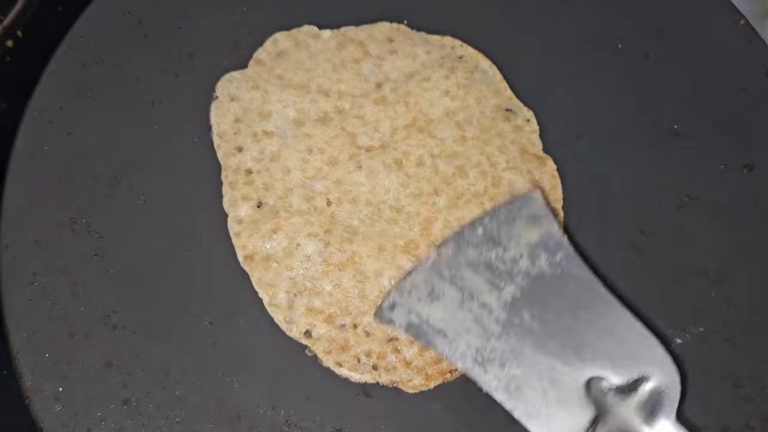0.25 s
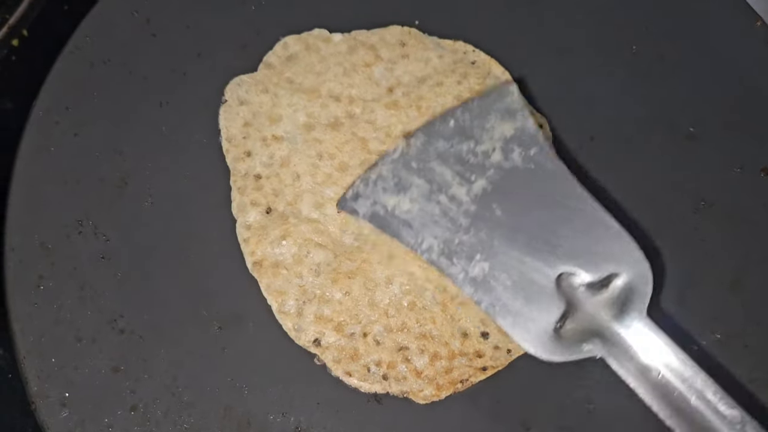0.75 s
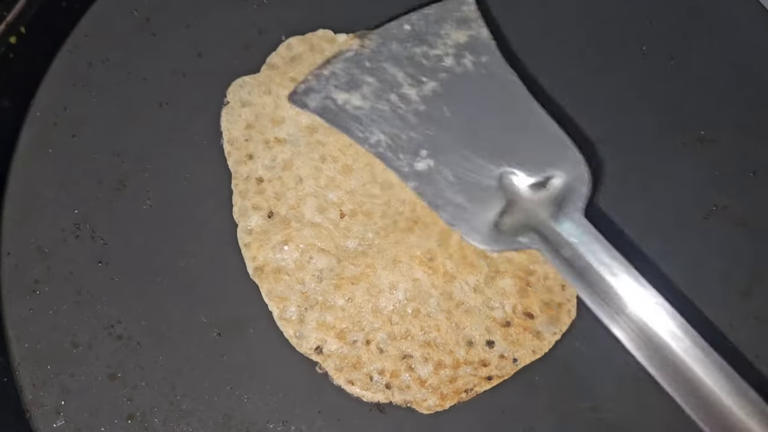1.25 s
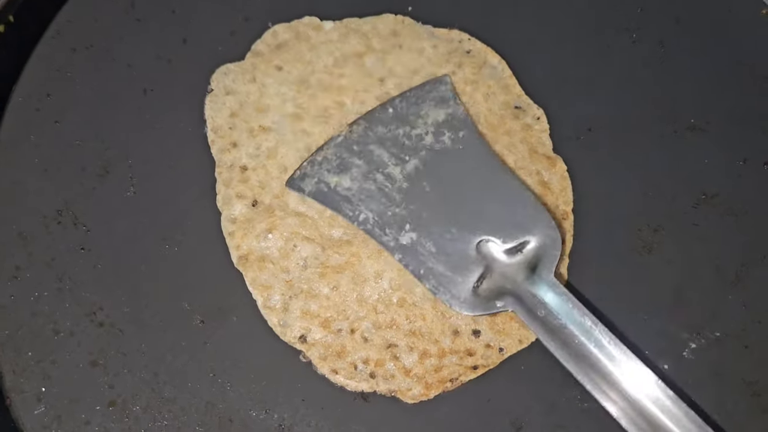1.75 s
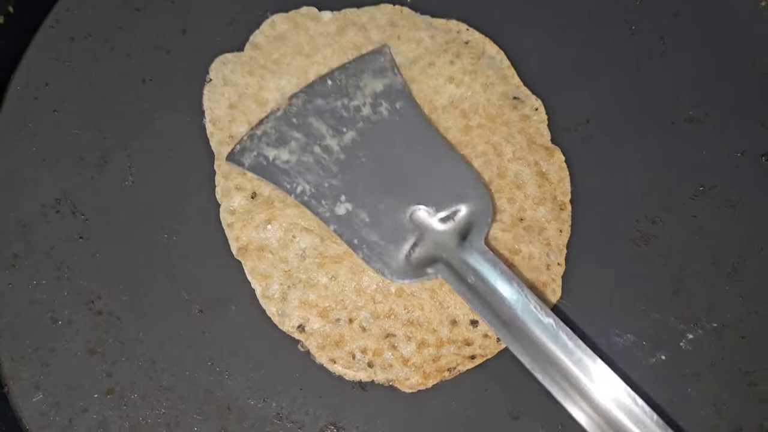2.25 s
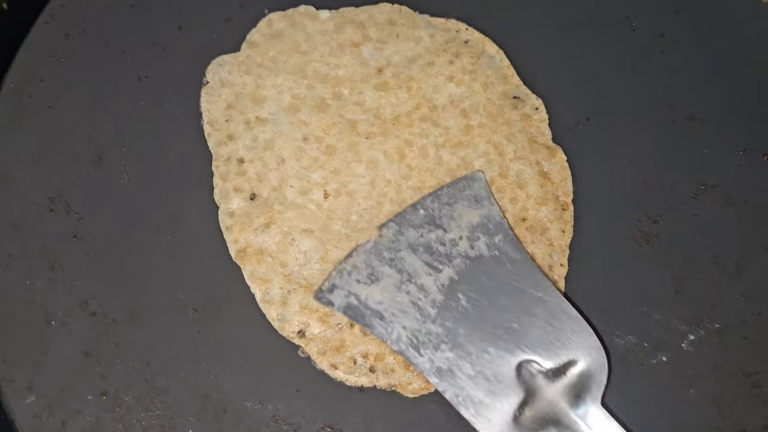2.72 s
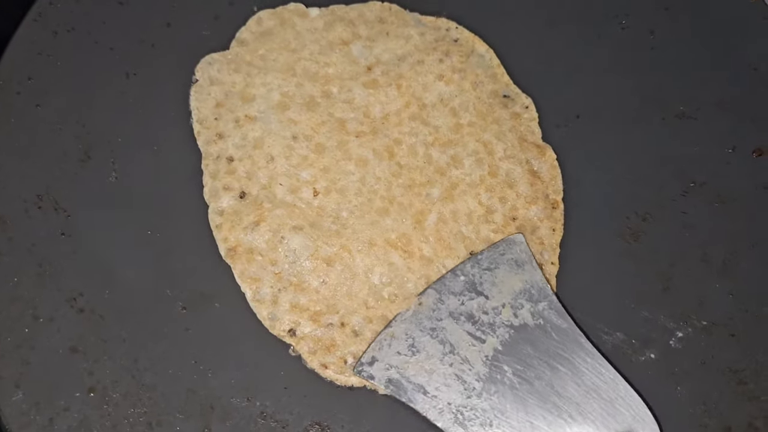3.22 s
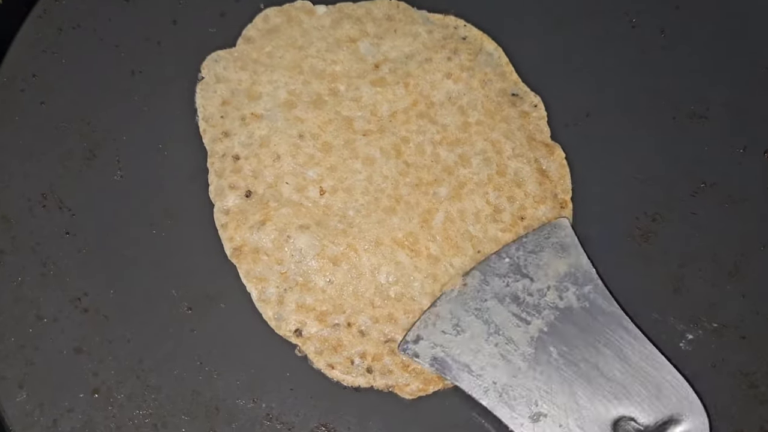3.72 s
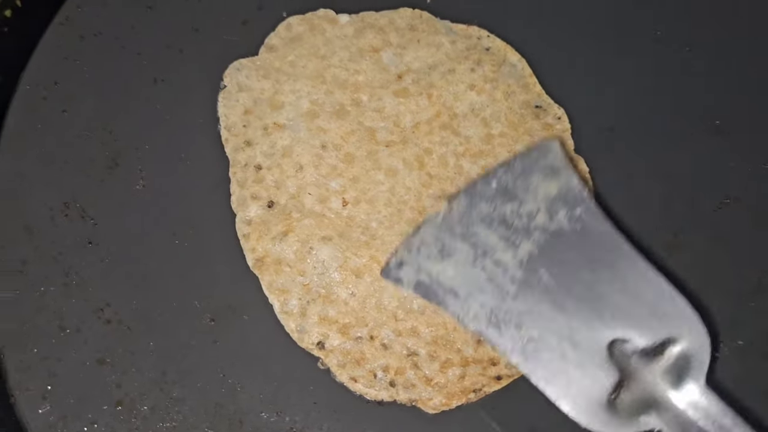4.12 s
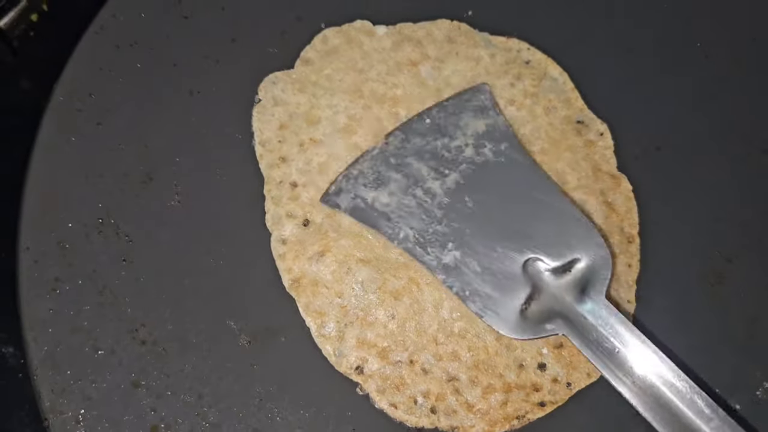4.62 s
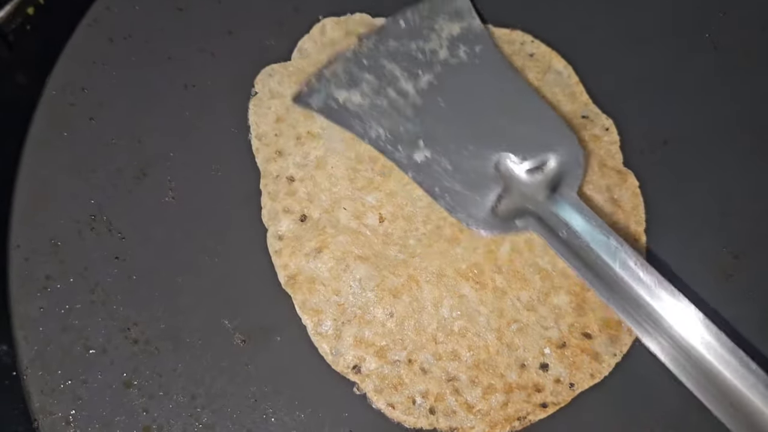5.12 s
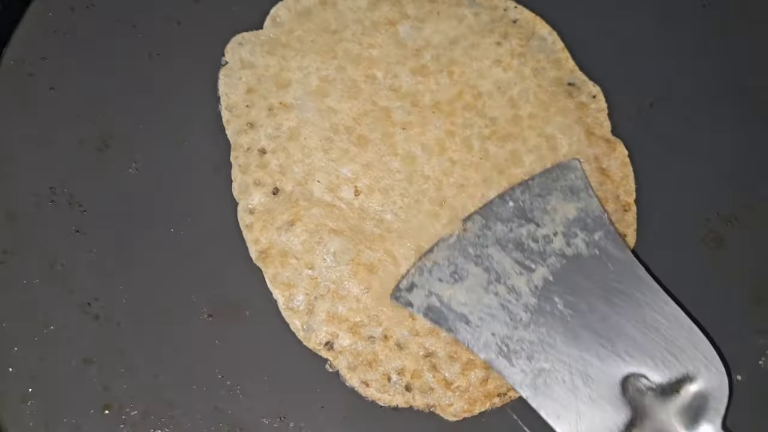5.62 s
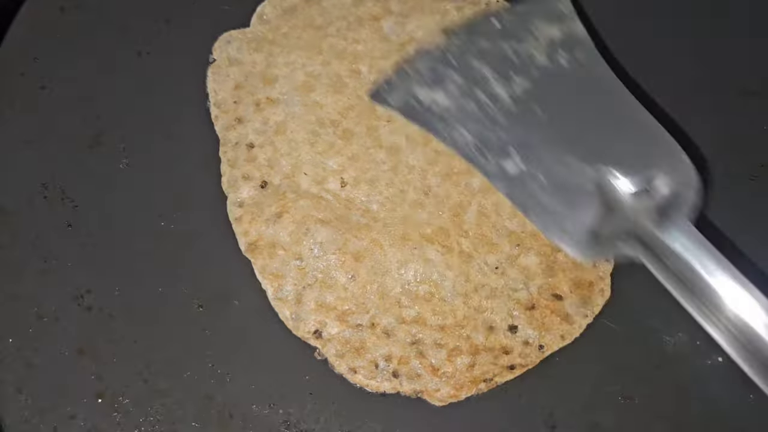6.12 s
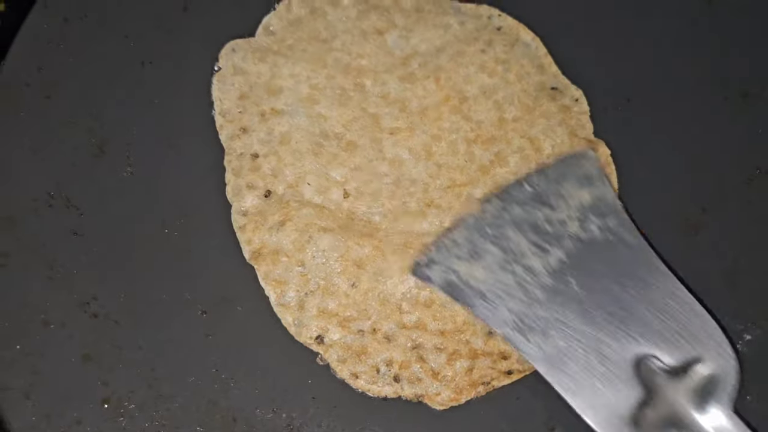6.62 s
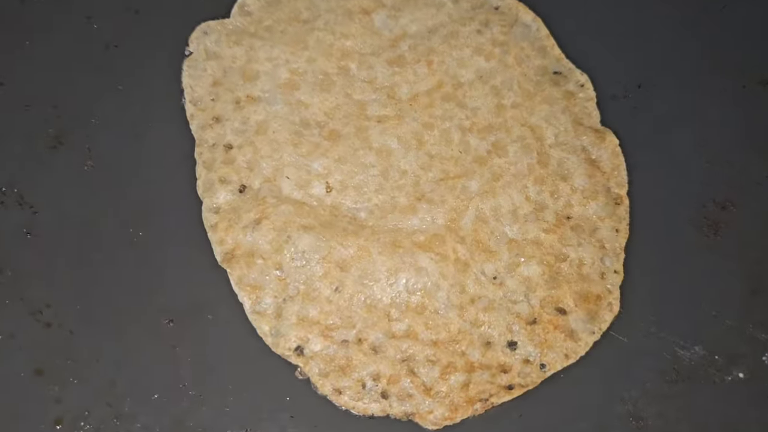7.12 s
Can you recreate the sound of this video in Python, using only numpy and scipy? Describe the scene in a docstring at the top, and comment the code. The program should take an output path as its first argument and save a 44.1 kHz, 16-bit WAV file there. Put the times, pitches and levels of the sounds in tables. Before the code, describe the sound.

Close stereo sound of a thin flatbread frying on a steel griddle: a fine high hiss, dense crackling and tiny sharp pops, over a faint kitchen rumble. Right away a spatula taps and presses, with a crunchy swell at 0.1 s and scrapes near 0.5 and 0.9 s. At about 1.4 s the sizzle surges, and again near 2.1 s. From 2.6 to 3.7 s presses follow closely, with rough dragging, crisp crust crunch and clustered pops; a firm clack lands at 3.4 s and another at 4.0 s. Softer taps come at 4.3 and 4.6 s, then the brightest, short metallic clink at 4.9 s with a burst of steam. Scrape and crunch return around 5.5 to 5.9 s, a second clear clink at 6.3 s, and a last scrape by 6.5 s. After that the frying thins to quiet hiss and scattered ticks, with two barely audible touches around 7.2 s, until 7.4 s.

```python
"""A thin flatbread fries on a steel griddle, heard close up: steam and fat spit in dense tiny noise bursts.
Sharp single pops, each a short sine blip with a bright spit and a push, stand out of the sizzle.
A steel spatula taps the bread: decaying sines ring its blade and the plate, noise bursts crack and knock.
Then it presses and drags, swelling the scrape, the crunch of the crust and the sizzle.
A dull thrum, a low kitchen rumble and a faint room tail lie underneath."""
import sys
import numpy as np
from scipy import signal
from scipy.fft import rfft, irfft, next_fast_len
from scipy.io import wavfile
from scipy.ndimage import map_coordinates

SR = 44100
rng = np.random.default_rng(int(sys.argv[2]) if len(sys.argv) > 2 else 0)


def log_audio(samples):
    """Write samples as a 16-bit WAV file to the path given in sys.argv[1]."""
    # one column per channel
    frames = np.atleast_2d(samples).T
    # limit to full scale, then quantise
    limited = np.clip(frames, -1, 1)
    pcm = np.round(limited * 32767).astype(np.int16)
    wavfile.write(sys.argv[1], SR, pcm)


N = 324537

# the bread frying untouched:
# (time [s], rustle of the crust [dB], sizzle of the fat [dB], kitchen rumble [dB])
QUIET_FRYING = [(0, -50.5, -54, -63.5), (.8, -49, -55.5, -60.5), (1.3, -50, -54.5, -66),
                (1.9, -48, -48, -63), (2.6, -50.5, -47, -67), (3.3, -54, -47.5, -62.5),
                (3.9, -55, -52, -61.5), (4.5, -57, -53, -61.5), (4.85, -55, -57, -61.5),
                (5.05, -59, -59, -54), (5.3, -52, -52.5, -59), (5.6, -58.5, -56.5, -66.5),
                (6.1, -55, -52.5, -65), (6.5, -51.5, -45.5, -65), (6.95, -57, -55, -65),
                (7.36, -56, -49.5, -65)]
# crunch and thrum over the rustle, steam over the sizzle
QUIET_CRUNCH_DB, QUIET_STEAM_DB, QUIET_THRUM_DB = -2.95, 0, -12.5
# the spatula presses or drags the bread; the sign of rise and fall is ignored:
# (time [s], rise [s per 10 dB], hold [s], fall before lingering [s per 10 dB],
#  drag [dB], crunch [dB], sizzle [dB], steam [dB], thrum [dB])
PRESS_STROKES = [(0.002, 0.5, 0.00988, -0.16, -49, -52.5, -53.5, -48, -64.5),
                 (.088, -6.72, 0.0496, 0.1636, -44, -33.5, -39.5, -39, -50),
                 (0.298, 0.26, 0.0196, 0.53, -44, -58, -46, -43, -61.5),
                 (0.505, -0.0041, 0.0394, 0.077, -37, -36, -45, -40.5, -46.5),
                 (0.682, 0.12, 0.0095, 0.1841, -48.5, -45, -44.5, -42, -58),
                 (0.927, -0.05, 0.0134, -0.0161, -39, -40, -39.5, -39, -59),
                 (1.092, 0.47, 0.203, 0.83, -50.5, -50.5, -44.5, -43, -66.5),
                 (1.384, 0.0367, 0.00871, 0.0966, -40, -42.5, -35, -33, -54),
                 (1.684, -0.3056, 0.0096, 0.154, -47, -46.5, -44, -42, -50.5),
                 (2.083, 0.06, 0.0205, 0.2257, -45, -47.5, -36.5, -35, -58.5),
                 (2.261, 0.01, 0.0098, 0.25, -43.5, -46.5, -42, -44, -57.5),
                 (2.429, -0.03, 0.0088, 0.1531, -43, -44, -39.5, -35.5, -52),
                 (2.611, 0.0084, 0.0366, .09, -35.5, -38.5, -39, -37, -42),
                 (2.79, 0.0312, 0.0274, 0.0838, -38, -31.5, -45, -41, -44),
                 (2.952, 0.0623, 0.0573, 0.0617, -40.5, -31, -38, -43.5, -48.5),
                 (3.141, 0.0945, 0.0733, 0.0621, -48.5, -34, -38, -42.5, -61),
                 (3.311, 0.59, 0.0194, -0.2131, -53, -47.5, -49.5, -43, -64),
                 (3.417, 0.1141, 0.05081, 0.0628, -54.5, -36.5, -39, -43.5, -55),
                 (3.663, 0.0526, 0.018, 0.1761, -49.5, -36.5, -38.5, -40.5, -51),
                 (3.986, 0.0067, .005, 0.0663, -39.5, -31.5, -35.5, -37.5, -44.5),
                 (4.176, 0.61, 0.01422, -0.45, -50, -49.5, -48, -48.5, -62),
                 (4.301, 0.0652, 0.0067, 0.1332, -45.5, -43, -49, -42, -47),
                 (4.416, 0.17, 0.02233, 0.24, -49.5, -52, -50.5, -48, -62),
                 (4.588, -0.0039, 0.0217, 0.1255, -41.5, -43, -47, -43.5, -47.5),
                 (4.787, 0.09, .01, 0.1754, -52, -45.5, -45.5, -48, -63),
                 (4.927, 0.0314, 0.0214, 0.1077, -43.5, -42.5, -35.5, -35, -52.5),
                 (5.148, 0.07, 0.0145, 0.1826, -44.5, -49, -42, -41, -54),
                 (5.489, 0.15, 0.0108, 0.0786, -38.5, -43.5, -48.5, -44.5, -48),
                 (5.678, 0.131, 0.0574, 0.1359, -40.5, -35, -51, -44, -50),
                 (5.873, 0.24, 0.00508, 0.0673, -65.5, -41.5, -42.5, -45, -64),
                 (5.998, 0.0905, .01, 0.21, -53, -51, -51.5, -54.5, -60.5),
                 (6.315, 0.0753, 0.045, 0.2422, -49.5, -49.5, -49.5, -45.5, -53),
                 (6.445, 0.0868, 0.0108, 0.0688, -40.5, -45.5, -40, -41, -53),
                 (6.521, 0.0012, 0.0153, 0.14, -43, -41, -48.5, -46, -54.5),
                 (7.081, 0.06, 0.00981, .08, -52, -53.5, -53, -59.5, -67),
                 (7.171, 0.38, 0.08, 0.2109, -57.5, -61, -60, -63.5, -54)]
# how long each layer dies away, against the stroke's fall: drag, crunch, sizzle, steam, thrum (factor [1])
LAYER_LINGER = [0.805, 1.05, 0.977, 1.042, 0.548]
# spectrum of the blade scraping: (frequency [Hz], relative level [dB])
DRAG_SPECTRUM = [(180, -46.5), (300, -14.5), (385, -40), (430, -13), (521, -6), (754, -12), (1020, -4),
                 (1150, -4), (2600, -9), (3380, -18.5), (5720, -120)]
# spectrum of the crust breaking: (frequency [Hz], relative level [dB])
CRUNCH_SPECTRUM = [(1000, -22.5), (1700, -8), (2300, -4.5), (2660, -7), (3010, -0.5), (3670, 0.5),
                   (5010, -3), (7500, -6.5), (9750, -38.5), (16500, -120)]
# spectrum of the spitting fat: (frequency [Hz], relative level [dB])
SIZZLE_SPECTRUM = [(3240, -24.5), (5500, -3), (6220, -5.5), (6750, -5.5), (7370, 1), (8840, 2), (9700, -3),
                   (12600, -37), (21300, -120)]
# spectrum of the hissing steam: (frequency [Hz], relative level [dB])
STEAM_SPECTRUM = [(5710, -20.5), (9700, -4), (11400, -1), (14600, -1), (15500, -7.5), (16000, -8.5)]
# spectrum of the bread's thrum on the plate: (frequency [Hz], relative level [dB])
THRUM_SPECTRUM = [(71, -57), (120, -49.5), (170, -3), (209, -8), (286, -4), (480, -16), (620, -53),
                  (1060, -120)]
# spectrum of the kitchen rumble: (frequency [Hz], relative level [dB])
RUMBLE_SPECTRUM = [(12, -49), (20, -5.5), (43, 0.5), (113, 0), (146, -8), (170, -3.5), (220, -33.5),
                   (370, -120)]
# how alike left and right are: (frequency [Hz], likeness [0-1])
STEREO_LIKENESS = [(50, 1), (500, 0.875), (1000, 1), (2000, 1), (4000, 0.2542), (8000, 0.1971),
                   (15000, 0.133)]
# the sharpest pops:
# (time [s], relative level [dB], pitch [Hz], relative treble spit [dB], left over right [dB])
SHARP_POPS = [(.0463, -25.5, 10900, -2, 1.5), (.1305, -20, 4300, -15, -3.5), (.15, -21, 6800, 0, -6),
              (.2747, -25, 1900, -2.5, 4), (.4008, -25.5, 1790, -6.5, 0), (.4413, -26.5, 11000, -6.5, 3.5),
              (.693, -25.5, 1597, -10.5, 1), (.7503, -12.5, 8500, -1.5, 12.5),
              (.9911, -18.5, 5200, -3, 4.5), (1.1259, -28.5, 2300, -3, -3), (1.2924, -24.5, 7905, 0, -3),
              (1.3182, -17.5, 8700, 0, 8), (1.3288, -21, 13000, 5, 8), (1.3333, -18, 9200, 1, 8),
              (1.563, -33, 8400, -8.5, 5), (1.7256, -23.5, 1880, -13, 4.5), (1.745, -16.5, 14400, 1, 7),
              (1.7784, -21.5, 5200, -3, 4.5), (2.092, -16.5, 13700, 0, 7), (2.1408, -22.5, 8500, -0.5, 4.5),
              (2.181, -23.5, 8430, -0.5, 6), (2.2065, -18.5, 8300, 0, 6), (2.2642, -20.5, 8400, 0, 7),
              (2.4977, -19.5, 12100, 1.5, 9.5), (2.5314, -24.5, 9000, 0, 12), (2.5564, -20, 7800, -1, 13),
              (2.606, -12, 7900, -13.5, 6), (2.699, -16.5, 3860, -1.5, 1), (2.7628, -21.5, 2700, -6, 3.5),
              (2.7913, -19.5, 2690, -7, 3), (2.7987, -21.5, 1786, -7.5, 2), (2.82, -23.5, 4000, -17, -3),
              (2.8237, -16.5, 3700, -19, -2), (2.8442, -15.5, 4000, -15, -6.5),
              (2.9127, -13.5, 3300, -10, 1), (2.944, -20.5, 3700, -17, -3.5),
              (2.9679, -20.5, 3700, -11.5, -2), (3.0067, -18.5, 3600, -10, -0.5),
              (3.037, -19.5, 3600, -10, -2), (3.3124, -16.5, 8475, 4, 6.5), (3.326, -18.5, 8700, 3.5, 4),
              (3.342, -22.5, 7800, 3, 7), (3.3903, -11, 7900, -11.5, 4.5), (3.4285, -20, 3500, -7.5, -0.5),
              (3.4523, -15.5, 3800, -4.5, 0.5), (3.5006, -23.5, 6500, -9, 6), (3.5414, -23, 8400, -2, 8.5),
              (3.5554, -18.5, 4100, -13.5, 1.5), (3.593, -17, 4370, -4, 3), (3.6134, -11, 13300, -3.5, 8),
              (3.6935, -17.5, 7700, 1.5, 1), (3.7685, -21.5, 7100, -7, 6.5), (3.8236, -25, 2700, -14.5, -6),
              (3.8376, -15.5, 6500, -1.5, 4.5), (3.8962, -21.5, 2810, 0.5, 0.5),
              (3.956, -21, 3317, -8.5, 1), (4.033, -16.5, 8300, -1.5, 4), (4.0906, -15.5, 8526, -1, 4.5),
              (4.1109, -22, 3220, -7, 3), (4.1629, -21.5, 12790, 3, 5), (4.1878, -20.5, 6840, -8.5, 12.5),
              (4.2416, -25.5, 8400, 0, 0.5), (4.3405, -22, 8600, -1, 8), (4.3716, -18.5, 3260, -2, 2.5),
              (4.4013, -24, 13100, 0, 5), (4.416, -24, 7800, -10.5, 16.5), (4.5205, -25, 8500, 0.5, 6),
              (4.5431, -26, 8100, -0.5, 8.5), (4.7703, -13.5, 8500, -4, 2), (4.8057, -21, 7100, -7, 1),
              (4.8246, -13.5, 6576, -5, 2.5), (5.0506, -14.5, 9300, -14.5, 5), (5.0823, -25.5, 9100, 3, 7),
              (5.156, -22, 8500, -0.5, 7), (5.2277, -17, 8600, -2, 8.5), (5.2524, -32, 8400, -2.5, 7),
              (5.2872, -23.5, 9300, -2, 6), (5.5875, -25, 3300, -4, 3.5), (5.6126, -23, 3700, -1, 1.5),
              (5.8704, -19, 3695, -9, -6), (5.9779, -25, 8400, 0.5, 6.5), (6.0313, -27.5, 2700, -0.5, 3),
              (6.124, -18, 6603, -7.5, 0.5), (6.1345, -22.5, 3000, -4.5, 4), (6.1375, -16.5, 6050, -6, 8.5),
              (6.142, -26.5, 2600, -6, 1.5), (6.2154, -20.5, 8100, -11, 0.5), (6.2588, -17.5, 7923, -8, 6),
              (6.2764, -27, 7400, -1.5, 8.5), (6.3767, -18, 8100, -0.5, 3.5), (6.587, -24, 7700, -4.5, 4.5),
              (6.6086, -24, 8500, -0.5, .5), (6.6396, -26, 3610, -3.5, 1.5), (6.709, -31.5, 1795, -4.5, 4),
              (6.72, -24, 8400, 2.5, 5), (6.7618, -27.5, 8700, 6, 6.5), (6.7963, -25.5, 8000, -2.5, 15),
              (6.8155, -28.5, 8600, 0, 5), (6.9615, -21.5, 7758, -3, 11.5), (7.1285, -25.5, 8700, 0, 7),
              (7.1408, -24, 8300, 0.5, 4.5), (7.1802, -27, 9700, 2, 0.5), (7.2294, -26.5, 7600, 1.5, 0),
              (7.2762, -23, 8500, 0, 6), (7.3359, -22.5, 7700, -10.5, 6.5)]
# spatula taps and bounces, all levels relative within their layer:
# (time [s], blade ring [dB], ring tilt [dB per octave], crack [dB], knock [dB], clack [dB],
#  first, second and third plate mode [dB], rise [s], t60 of crack, knock and clack [s])
SPATULA_TAPS = [(0.0779, -35, -3, -20, -27.5, -17, -52, -55.5, -35, 0.00213, 0.053),
                (.482, -26.5, -1, -25.5, -25, -25, -40, -44, -34, 0.00164, 0.0402),
                (.121, -45, 0, -34.5, -34.5, -24, -67.5, -68.5, -60, 0.00205, 0.052),
                (0.1444, -45.5, 0, -31, -53.5, -24.5, -65.5, -66.5, -66, 0.000946, 0.025),
                (0.9113, -31.5, 1.5, -26.5, -32.5, -43, -41, -45, -63.5, 0.00106, 0.0453),
                (1.3602, -36, -2.5, -25.5, -42.5, -49.5, -41.5, -48, -62, 0.00197, 0.247),
                (1.648, -26.5, 2, -27, -29, -41.5, -51.5, -46.5, -30, 0.00105, 0.0435),
                (2.001, -38, -1, -26, -38, -45, -43.5, -59, -66, 0.00184, 0.058),
                (2.049, -50, 2, -36.5, -44, -45, -66, -69.5, -63, 0.00164, 0.08),
                (2.241, -51.5, -3.5, -37.5, -42.5, -52.5, -68, -63, -61, 0.0014, 0.08),
                (2.4139, -50, -4, -33, -40, -48, -65.5, -67.5, -58, .002, 0.109),
                (2.59, -44.5, 0.5, -47.5, -38, -49.5, -66.5, -65.5, -53, 0.0056, 0.318),
                (3.371, -18, -3, -12, -28.5, -14.5, -44.5, -51, -39.5, 0.00187, 0.0303),
                (3.402, -40, -0.5, -27, -47.5, -31, -67, -72.5, -59, 0.00274, 0.171),
                (3.659, -28, 5.5, -25.5, -34.5, -17, -45, -44, -53, 0.00216, 0.0385),
                (3.9702, -23.5, -0.5, -19.5, -26.5, -15.5, -46.5, -54, -37, 0.0026, 0.04532),
                (4.2895, -37, -1, -41, -26, -32, -45.5, -50.5, -55, 0.00077, 0.0306),
                (4.5813, -28, -1, -23, -27.5, -34.5, -41.5, -49.5, -57, 0.00144, 0.0436),
                (4.9122, -6, 0.5, -11.5, -34.5, -30, -37, -45, -60.5, 0.00017, 0.03),
                (4.933, -17.5, 2, -27, -50, -43.5, -65, -61, -65.5, 0.0013, 0.109),
                (5.4735, -45, 0, -41.5, -24.5, -50, -54, -60.5, -52.5, 0.000243, 0.0115),
                (6.2994, -13, -1, -11.5, -36, -25, -51, -52.5, -62, 0.000152, 0.036),
                (6.311, -28.5, 1, -40, -36.5, -31.5, -66, -68, -65.5, 0.00044, 0.01055),
                (7.1569, -50, -5, -44.5, -46, -45.5, -72, -70.5, -34.5, 0.00186, 0.043),
                (7.228, -50, 0, -49, -47, -52.5, -72, -65, -41.5, 0.0025, 0.02307)]
# modes of the blade, damped by the bread: (frequency [Hz], nominal width [Hz], relative level [dB])
BLADE_MODES = [(2035, 80, -14), (2790, 90, -15), (3460, 120, -6), (4200, 80, -3.5), (3620, 120, -6),
               (4760, 170, -8), (6480, 90, -5), (7150, 140, -6), (8400, 170, -13), (8470, 100, -7),
               (9470, 144, -3.5), (10050, 200, 1), (10800, 160, -7), (11900, 90, -10), (12420, 130, 0),
               (12245, 90, -3), (12930, 100, -9), (13460, 90, -9), (14340, 60, -8), (14620, 80, -10)]
# modes of the plate: (frequency [Hz], t60 [s])
PLATE_MODES = [(70, 0.55), (113, 1), (292, 0.0742)]
# a plate mode that sounds with the second one: (frequency [Hz], level against it [dB], t60 [s])
PLATE_OVERTONE = (190, -10, 0.6094)
# spectrum of a tap's bright crack, before the ring tilt: (frequency [Hz], relative level [dB])
CRACK_SPECTRUM = [(2650, -31.5), (4500, -9), (5250, -11), (8070, 0.5), (11500, -5.5), (12300, -4.5),
                  (16000, -4.5)]
# spectrum of a tap's dull knock: (frequency [Hz], relative level [dB])
KNOCK_SPECTRUM = [(120, -0.5), (200, -12.5), (390, -4), (517, 6), (689, -1), (1080, 6.5), (1370, 3),
                  (1760, 2.5), (2060, -2), (2350, -14), (2800, -9), (3640, -56), (6160, -120)]
# spectrum of a tap's hard clack: (frequency [Hz], relative level [dB])
CLACK_SPECTRUM = [(1180, -24.5), (2000, -14), (2810, -9.5), (3220, -1.5), (4120, -4.5), (4550, -4.5),
                  (5950, -12), (7000, -9.5), (9100, -16), (15400, -120)]
# how fast the kitchen's answer dies: (frequency [Hz], t60 [s])
KITCHEN_DECAY = [(200, 0.2615), (2000, 0.6), (12000, 0.172)]
# a dip of the microphone housing: (centre [Hz], width [Hz], depth [0-1])
HOUSING_DIP = (9774, 275, 0.442)
TOP_HZ = 15900  # the band limit


def amp(db):
    """dB to gain."""
    return 10 ** (np.asarray(db) / 20)


def unit(x):
    """Scaled to rms 1."""
    return x / np.sqrt(np.mean(x ** 2) + 1e-20)


def along(points, hz):
    """Reads (frequency [Hz], value) points on a log frequency axis."""
    f, v = np.transpose(points)
    return np.interp(np.log(hz + 1), np.log(f + 1), v)


def curves(rows):
    """One value per sample for each column after the time."""
    s, *cols = np.transpose(rows)
    return [np.interp(np.arange(N) / SR, s, c) for c in cols]


def wobble(rate):
    """A smooth random curve, rate knots a second."""
    knots = rng.standard_normal(int(N * rate / SR) + 4)
    return map_coordinates(knots, [np.arange(N) * rate / SR])


def filtered(x, response):
    """x shaped by a complex response of frequency."""
    n = x.shape[-1]
    m = next_fast_len(n + 8192)
    return irfft(rfft(x, m) * response(np.fft.rfftfreq(m, 1 / SR)), m)[..., :n]


def shaped(x, spectrum):
    """x coloured by a spectrum and scaled to rms 1."""
    return unit(filtered(x, lambda hz: amp(along(spectrum, hz))))


def spread(pair, spectrum, lead):
    """Colours two signals and mixes them into a stereo pair of rms 1; the left hears it lead seconds early."""
    def mid_side(hz):
        turn = np.arccos(np.clip(along(STEREO_LIKENESS, hz), -1, 1)) / 2
        return amp(along(spectrum, hz)) * [np.cos(turn), np.sin(turn)]

    mid, side = filtered(pair, mid_side)
    left_right = np.array([mid + side, mid - side])
    return unit(filtered(left_right, lambda hz: np.exp(1j * np.pi * lead * hz * [[1], [-1]])))


def grainy(spectrum, strength, lead):
    """Coloured stereo noise under a changing strength."""
    return spread(strength * rng.standard_normal((2, N)), spectrum, lead)


def spatter(per_second, spiky_db, life, bed_db, clump_db, clump_rate):
    """Strength over time: a rain of short bursts with a long tail of sizes, clumped, over a smooth bed."""
    sizes = amp(spiky_db * np.minimum(rng.exponential(size=N), 3.5))
    hits = (rng.random(N) < per_second / SR) * sizes
    # the power of each burst decays by e in life seconds
    power = signal.lfilter([1], [1, -np.exp(-1 / (life * SR))], hits ** 2)
    return (unit(np.sqrt(power)) + amp(bed_db)) * amp(clump_db * wobble(clump_rate))


def levels():
    """Layer levels in dB: each press or drag swells, holds and dies in power over the quiet frying."""
    step = 64
    t = np.arange(0, N, step) / SR
    rustle_db, fat_db, rumble_db = curves(QUIET_FRYING)
    s, rise, hold, fall, *peak_db = np.transpose(PRESS_STROKES)[..., None]
    early = np.clip(s - t, 0, None) / abs(rise)
    late = np.clip(t - s - abs(hold), 0, None) / abs(fall)
    quiet_db = [rustle_db, rustle_db + QUIET_CRUNCH_DB, fat_db, fat_db + QUIET_STEAM_DB,
                rustle_db + QUIET_THRUM_DB]
    layers_db = []
    for quiet, db, linger in zip(quiet_db, peak_db, LAYER_LINGER):
        swell = np.sum(amp(2 * (db - 10 * early - 10 * late / linger)), axis=0)
        swell = np.interp(np.arange(N) / SR, t, swell)
        layers_db.append(10 * np.log10(amp(2 * quiet) + swell))
    return layers_db + [rumble_db]


def blade_drag(level_db, rub, crack):
    """The blade scrapes the crust: low-mid noise grained by rubbing and a share of the crackle."""
    grain = unit(rub) + 0.573 * unit(crack)
    return amp(level_db + 0.02) * grainy(DRAG_SPECTRUM, grain, lead=0.0001235) * amp([[.3], [-.3]])


def crust_crunch(level_db, crack, spit):
    """The crust breaks in crackling mid-band noise, with some of the fat's spatter in it."""
    grain = unit(crack) + .4 * unit(spit)
    return amp(level_db - 1.45) * grainy(CRUNCH_SPECTRUM, grain, lead=.00002) * amp([[-.7], [.7]])


def fat_sizzle(level_db, spit):
    """Fat spits: treble noise in dense tiny bursts."""
    return amp(level_db - 1.09) * grainy(SIZZLE_SPECTRUM, spit, lead=0.0001844) * amp([[.7], [-.7]])


def steam_hiss(level_db, spit):
    """Steam escapes with the spitting fat: the highest noise, on the same bursts."""
    return amp(level_db - 0.48) * grainy(STEAM_SPECTRUM, spit, lead=0.0001818) * amp([[.7], [-.7]])


def frying(drag_db, crunch_db, sizzle_db, steam_db):
    """Drag, crunch, fat and steam share their spatters, so that related layers flicker together."""
    spit = spatter(per_second=400, spiky_db=4.5, life=0.00092, bed_db=1.5, clump_db=1.06, clump_rate=55)
    crack = spatter(per_second=400, spiky_db=3, life=0.000325, bed_db=-0.5, clump_db=1.89, clump_rate=37)
    rub = spatter(per_second=450, spiky_db=4.5, life=.001, bed_db=-3, clump_db=1.2, clump_rate=25)
    contact = blade_drag(drag_db, rub, crack) + crust_crunch(crunch_db, crack, spit)
    return contact + fat_sizzle(sizzle_db, spit) + steam_hiss(steam_db, spit)


def thrum(level_db):
    """The bread thrums dully on the plate: low noise in sparse, clumped lumps."""
    lumps = spatter(per_second=60, spiky_db=3, life=0.00433, bed_db=-6.0, clump_db=3.83, clump_rate=17)
    return amp(level_db - 4.5) * grainy(THRUM_SPECTRUM, lumps, lead=.0001)


def rumble(level_db):
    """The kitchen rumbles: smooth deep noise."""
    return amp(level_db + 3.0) * grainy(RUMBLE_SPECTRUM, 1, lead=0)


def small_pops(per_second, level_db):
    """The many faint pops around the sharp ones, at chance times, sizes, pitches and spots."""
    draw = rng.random((int(per_second * N / SR), 5))
    return [(s * (N / SR), level_db - 3.07 * np.log(1 - .95 * size), 2500 * 5 ** pitch, -3 * dull,
             9 * spot - 1.5) for s, size, pitch, dull, spot in draw]


def pops():
    """A steam pocket bursts: a brief blip at its own pitch, a bright spit and a small push, at its own spot."""
    out = np.zeros((2, N + SR))
    t = np.arange(300) / SR
    attack = 1 - np.exp(-t / 0.00008)
    for s, db, hz, spit_db, pan_db in [*SHARP_POPS, *small_pops(per_second=50, level_db=-37.5)]:
        phase = rng.random()
        blip = np.sin(2 * np.pi * (hz * t + phase)) * np.exp(-t * hz / 0.938)
        # noise partly shared by both sides, differenced to brighten it
        grit = rng.standard_normal(len(t) + 1) + 0.61 * rng.standard_normal((2, len(t) + 1))
        spit = signal.lfilter([1, .7], [1], np.diff(grit)) * np.exp(-t / 0.00068)
        spit = amp(spit_db - 9.0) * spit
        dull = np.sqrt(np.clip(1.05 - amp(2 * spit_db), .05, 1))  # what the treble lacks goes into the push
        push = 0.474 * dull * (1 - t / .00008) * np.exp(-t / .00008)
        pan = np.array([[pan_db], [-pan_db]]) / 2
        pop = amp(db + 4 + pan) * ((blip + spit) * attack + push)
        at = round(s * SR)
        late = int(np.clip(pan_db, 0, 8))  # louder on the left also arrives there first, in samples
        out[0, at:at + len(t)] += pop[0]
        out[1, at + late:][:len(t)] += pop[1]
    return out[:, :N]


def blade_ring(t, tilt):
    """The blade's modes ring as decaying sines; level and phase vary from side to side."""
    damping = np.exp(-.22 * tilt)  # a dull, flat landing lies on the bread and stops the ring sooner
    ring = 0
    for hz, width, level in BLADE_MODES:
        gain = amp(level + tilt * np.log2(hz / 8000) + rng.normal(0, 2.5, (2, 1)))
        phase = rng.random((2, 1)) * hz / 9000
        ring = ring + gain * np.exp(-2.2 * width * damping * t) * np.sin(2 * np.pi * (hz * t + phase))
    return ring


def plate_hum(t, hum_db):
    """The struck plate hums in a few low decaying sines."""
    modes = [(hz, db, t60) for (hz, t60), db in zip(PLATE_MODES, hum_db)]
    hz, under_db, t60 = PLATE_OVERTONE
    modes.append((hz, hum_db[1] + under_db, t60))
    swell = 1 - np.exp(-t / 0.0094)
    return sum(amp(db - 60 * t / t60) * np.sin(2 * np.pi * hz * t) * swell for hz, db, t60 in modes)


def taps():
    """Each tap rings the damped blade, cracks and knocks the bread and sets the plate humming."""
    out = np.zeros((2, N + SR))
    t = np.arange(SR) / SR
    short = t[:SR // 5]
    for s, ring_db, tilt, crack_db, knock_db, clack_db, *hum_db, rise, t60 in SPATULA_TAPS:
        onset = (1 - np.exp(-short / rise)) ** 2
        fade = onset * amp(-60 * short / t60)
        ring = onset * blade_ring(short, tilt)
        crack = unit(filtered(rng.standard_normal((2, len(short))), lambda hz: amp(
            along(CRACK_SPECTRUM, hz) + tilt * np.log2((hz + 1) / 8000))))
        # knock and clack share one noise, nearly alike on both sides
        common = rng.standard_normal(len(short)) + 0.215 * rng.standard_normal((2, len(short)))
        knock = amp(knock_db + 5.5) * shaped(common, KNOCK_SPECTRUM)
        clack = amp(clack_db + 2.0) * shaped(common, CLACK_SPECTRUM)
        at = round(s * SR)
        out[:, at:at + len(short)] += amp(ring_db - 7.5) * ring
        out[:, at:at + len(short)] += fade * (amp(crack_db) * crack + knock + clack)
        out[:, at:at + SR] += plate_hum(t, hum_db)
    return out[:, :N]


def kitchen(x):
    """The walls answer with a noise tail; each frequency dies at its own speed."""
    hz, t, z = signal.stft(rng.standard_normal((2, SR // 3)), SR, nperseg=256)
    decay = amp(-60 * t / along(KITCHEN_DECAY, hz)[:, None])
    tail = signal.istft(z * decay, SR, nperseg=256)[1]
    delayed = np.pad(x, ((0, 0), (150, 0)))  # samples before the walls answer
    return signal.fftconvolve(delayed, tail / np.linalg.norm(tail[0]), axes=1)[:, :N]


def scene():
    """Frying, lows, pops and taps together; only pops and taps rouse the room, and all but pops tip left."""
    *fry_db, thrum_db, rumble_db = levels()
    steady = frying(*fry_db) + thrum(thrum_db) + rumble(rumble_db)
    hits = pops() + taps() * amp([[.2], [-.2]])
    return hits + amp(-16.5) * kitchen(hits) + steady * amp([[1.1], [-1.1]])


def record(dry):
    """The microphone housing dips one treble band and thins the deepest bass; a steep limit ends the top."""
    centre, width, depth = HOUSING_DIP

    def response(hz):
        low_cut = hz ** 2 / (hz ** 2 + 22 ** 2)
        dip = 1 - depth * np.exp(-((hz - centre) / width) ** 2)
        return dip * low_cut / (1 + (hz / TOP_HZ) ** 200)

    return filtered(dry, response)


dry = scene()
out = record(dry)
log_audio(out)
```